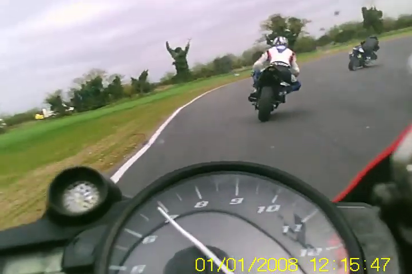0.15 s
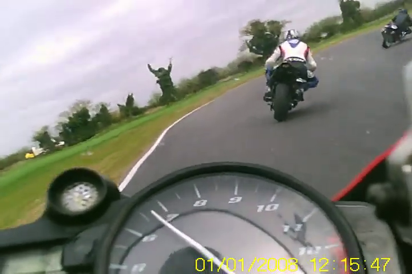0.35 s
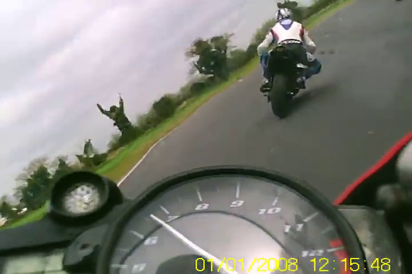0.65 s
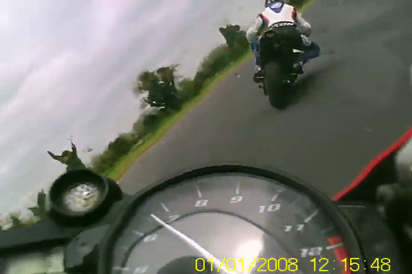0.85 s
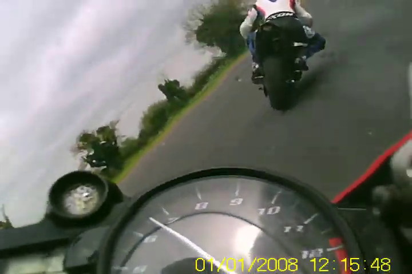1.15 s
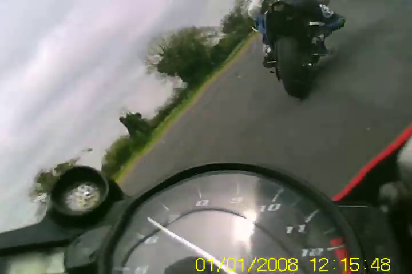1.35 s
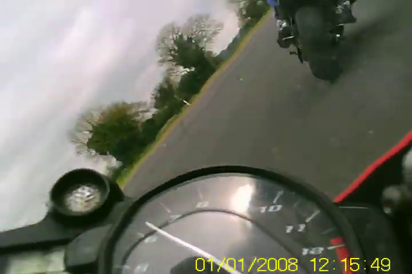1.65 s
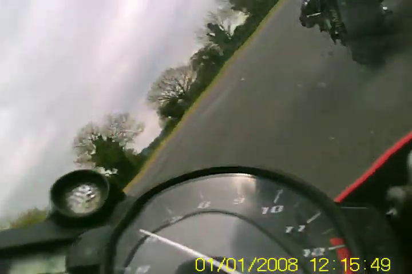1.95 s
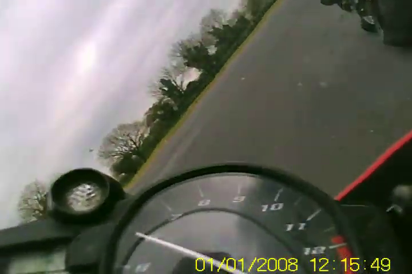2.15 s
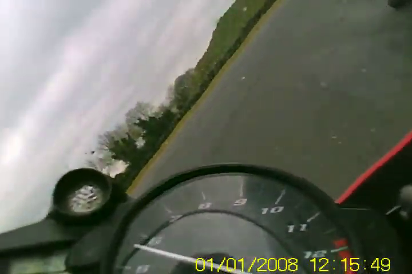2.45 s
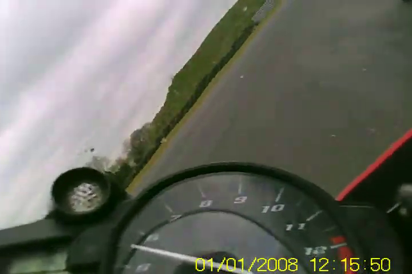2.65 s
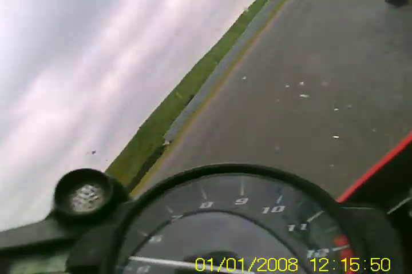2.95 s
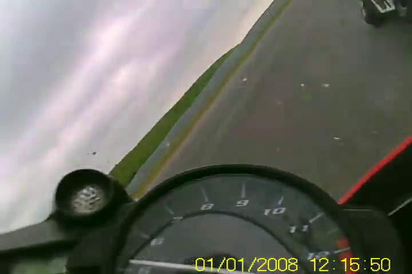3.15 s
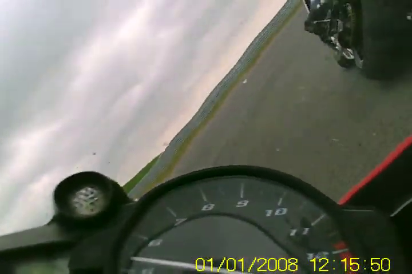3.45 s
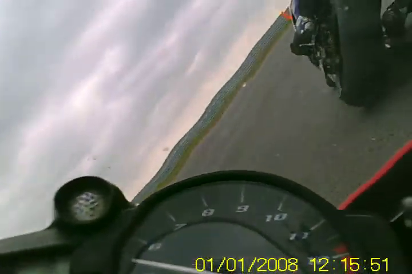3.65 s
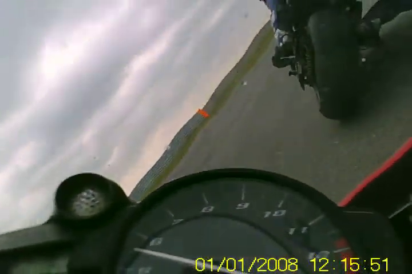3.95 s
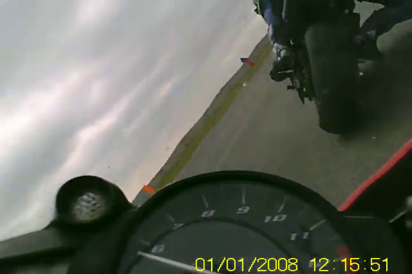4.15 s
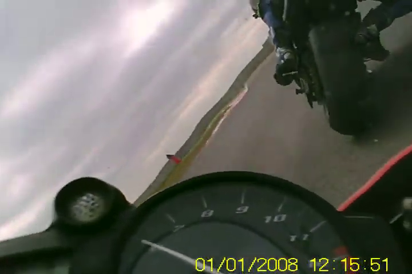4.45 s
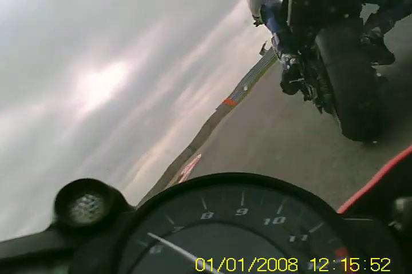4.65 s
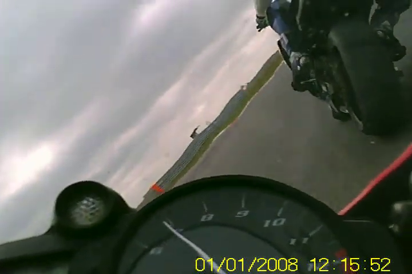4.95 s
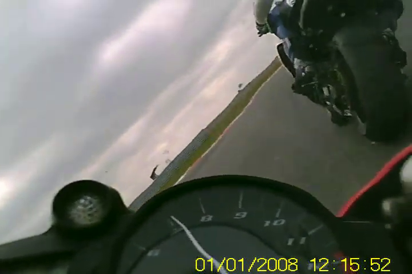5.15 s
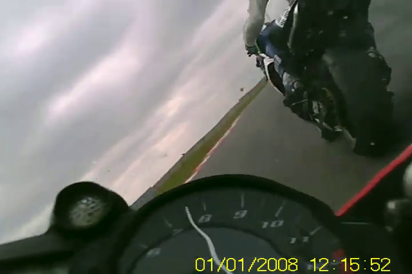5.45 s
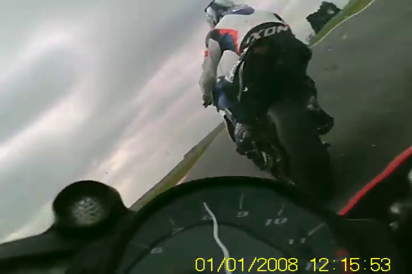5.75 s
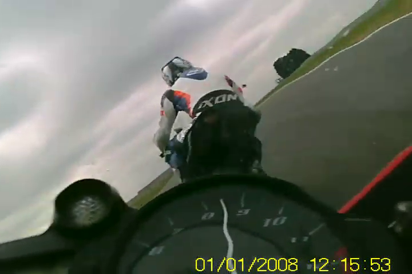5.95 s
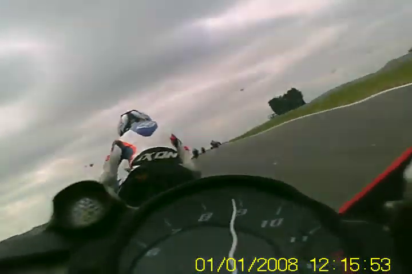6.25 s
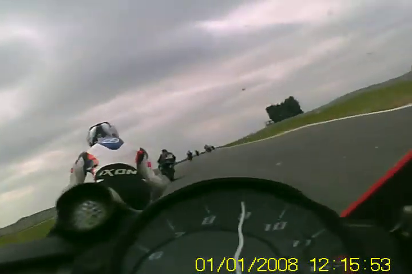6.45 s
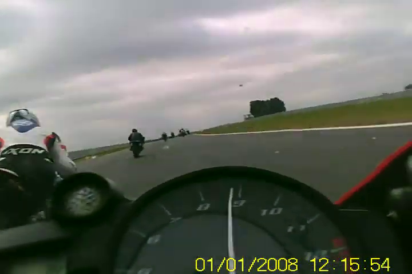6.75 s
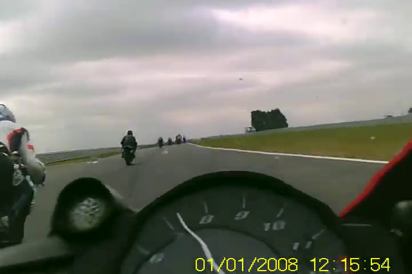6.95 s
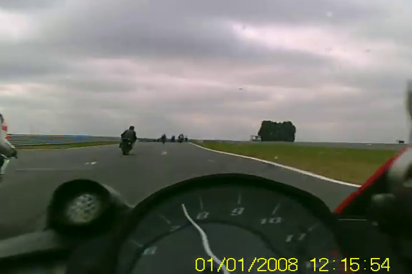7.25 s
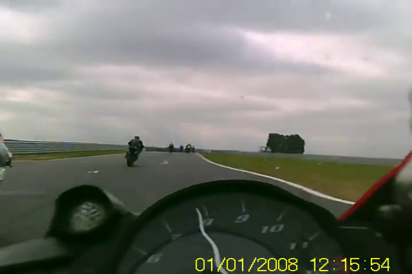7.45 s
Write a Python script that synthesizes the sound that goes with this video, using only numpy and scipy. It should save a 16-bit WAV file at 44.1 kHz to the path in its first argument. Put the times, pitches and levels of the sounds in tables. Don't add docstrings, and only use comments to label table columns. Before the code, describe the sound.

A rough microphone fixed behind a motorcycle screen picks up boxy engine drone, sharp plastic slapping and gusty low wind. The bike slows into a bend, bumps thudding, and the rattling dies away. A second, rougher engine murmurs close ahead. Revs then rise strongly, the chatter returns and thickens into a harsh, slightly distorted buzz, before an upshift drops the pitch and acceleration resumes.

```python
import sys
import numpy as np
from scipy import signal
from scipy.fft import rfft, irfft, next_fast_len
from scipy.io import wavfile
from scipy.ndimage import uniform_filter1d, map_coordinates

SR = 44100
rng = np.random.default_rng(int(sys.argv[2]) if len(sys.argv) > 2 else 0)


def makeup_ratio(level_db):
    decades = np.asarray(level_db, float) / 20
    return 10 ** decades


def int16_out(signal):
    q = np.round(np.clip(np.atleast_2d(signal).T, -1, 1) * 32767)
    wavfile.write(sys.argv[1], SR, q.astype(np.int16))


N = 335160


def unit(x):
    return x / np.sqrt(np.mean(x ** 2) + 1e-20)


def steadied(x, size):
    return x / np.sqrt(np.abs(uniform_filter1d(x ** 2, size=size)) + 1e-12)


def along(points, hz):
    f, v = np.transpose(points)
    return np.interp(np.log(hz + 1), np.log(f + 1), v)


def curves(rows):
    s, *cols = np.transpose(rows)
    return [np.interp(np.arange(N) / SR, s, c) for c in cols]


def spells(rows, column, edge_s):
    t = np.arange(N) / SR
    total = np.zeros(N)
    for row in rows:
        inside = np.minimum(t - row[0], row[0] + row[1] - t)
        total += row[column] * np.clip(inside / edge_s + 0.5, 0, 1)
    return total


def wobble(rate, count=N):
    knots = rng.standard_normal(int(count * rate / SR) + 2)
    return np.interp(np.arange(count) * rate / SR, np.arange(len(knots)), knots)


def filtered(x, response):
    m = next_fast_len(N + SR // 4)
    return irfft(rfft(x, m) * response(np.fft.rfftfreq(m, 1 / SR)), m)[..., :N]


def rush(spectrum):
    return unit(filtered(rng.standard_normal(N), lambda hz: makeup_ratio(along(spectrum, hz))))


def tone(turns, db, flutter_db, rate):
    level_db = db + flutter_db * wobble(rate, len(turns))
    return -np.sqrt(2) * makeup_ratio(level_db) * np.cos(2 * np.pi * turns)


# f/Hz, level/dB
SCREEN_CAVITY = [(80, -8), (150, -9), (250, 5), (320, -3), (420, 3.5), (550, -1), (700, -5), (900, -4),
                 (1200, -1.5), (1500, -13), (2200, -3)]


def stack(turns, level_db, orders, flutter_db, rate, blend):
    step = 8
    coarse = 0
    for multiple, *column_db in orders:
        order_db = level_db[::step] + np.interp(blend[::step], np.arange(len(column_db)), column_db)
        coarse = coarse + tone(multiple * turns[::step] + rng.random(), order_db, flutter_db, rate * step)
    orders_sum = signal.resample_poly(coarse, step, 1)[:N]
    return filtered(orders_sum, lambda hz: makeup_ratio(along(SCREEN_CAVITY, hz)))


def load():
    return curves(OWN_ENGINE)[2] - spells(THROTTLE_LIFTS, column=3, edge_s=0.034)


def in_step(turns):
    s = np.transpose(SLAPS)[0]
    phase = np.exp(2j * np.pi * np.interp(s * SR, np.arange(N), turns + 0.14))
    smooth = np.convolve(phase, np.hanning(7), "same")
    late = np.unwrap(np.angle(smooth)) / (2 * np.pi)
    return turns - uniform_filter1d(np.interp(np.arange(N) / SR, s, late), size=SR // 10)


# t/s, firing rate f/Hz, firing tone level/dB, load level/dB
OWN_ENGINE = [(0.0, 213, -29.5, -37.5), (0.5, 211.6, -21, -31), (1.0, 213.6, -20, -33),
              (1.6, 197.9, -20, -32), (2.0, 186.8, -18.5, -37.5), (2.85, 163.7, -19, -38.5),
              (3.1, 163.5, -20, -37.5), (4.1, 182, -17.5, -36), (4.4, 195.4, -20, -29),
              (4.8, 222, -25, -28), (5.2, 232.9, -34.5, -24.5), (5.6, 254.6, -22, -24.5),
              (5.8, 270.1, -14, -20), (6.2, 283.1, -15, -20), (6.62, 303.2, -18.5, -19),
              (6.75, 228.5, -23.5, -24), (7.0, 235.5, -24, -26), (7.6, 263.4, -19.5, -21.5)]
# t/s, length/s, loss of firing tone/dB, loss of load/dB
THROTTLE_LIFTS = [
    (2.84, 0.252, 7.5, 2),
    (6.62, 0.175, 9, 2),
    (6.69, 0.077, -6, 6),
]
# f/Hz, level/dB
EXHAUST_PIPE = [(330, -4.5), (355, -3), (385, -1.5), (415, -7), (450, 0), (495, -15), (560, -2.5),
                (640, -14), (750, -7)]
# multiple of firing rate, coasting/dB, driving/dB, flat out/dB
OWN_WEAK_ORDERS = [(.5, -2, -0.5, -5), (.75, -7, -12, -17.5), (1.25, -24, -26, -25), (1.5, -21.5, -8, -19),
                   (2.249, -25, -21, -7.5), (2.5, -14.5, -29, -14), (2.75, -18.5, -13, -23),
                   (3.25, -24, -7, -9.5), (3.5, -10.5, -11.5, -22), (3.75, -20, -13, -12.5),
                   (4, -8, -20, -16.5), (4.25, -20, -12, -21), (4.5, -12, -15, -15),
                   (4.75, -18, -18.5, -10), (5, -11.5, -13, -12), (5.5, -13.5, -15.5, -12),
                   (5.75, -20, -27, -14), (6, -12.5, -21, -9.5), (6.5, -11, -12, -17),
                   (6.75, -20, -16, -28), (6.998, -21, -27, -14), (7.248, -24, -9, -16.5),
                   (7.502, -16, -20, -33), (8, -35, -21, -24)]
LOAD_STATES = (-30, -26, -20)


def own_engine():
    hz, first_db, _ = curves(OWN_ENGINE)
    turns = in_step(np.cumsum(hz * (1 + 0.0023 * wobble(60))) / SR)
    lift_db = spells(THROTTLE_LIFTS, column=2, edge_s=0.018)
    above = load() + 30
    second_db = -31 + 1.05 * above + along(EXHAUST_PIPE, 2 * hz) - lift_db
    third_db = -30 + 0.21 * above + along(EXHAUST_PIPE, 3 * hz) - lift_db
    sound = tone(turns, first_db - lift_db, flutter_db=1.1, rate=34)
    sound = sound + tone(2 * turns, second_db, flutter_db=3.5, rate=15)
    sound = sound + tone(3 * turns, third_db, flutter_db=2.0, rate=12)
    blend = np.interp(load(), LOAD_STATES, np.arange(3))
    weak = stack(turns, load() + 1.7, OWN_WEAK_ORDERS, flutter_db=3.0, rate=11, blend=blend)
    return sound + weak, turns


# t/s, engine cycle rate f/Hz, firing tone level/dB, upper orders level/dB
ENGINE_AHEAD = [(0.0, 44.24, -37.5, -45), (0.6, 41.4, -32.5, -77), (1.4, 38.02, -28, -59),
                (1.9, 36.51, -54, -41), (2.8, 39.48, -35, -35.5), (3.4, 41.43, -44.5, -33.5),
                (4.1, 43.07, -30.5, -32.5), (4.6, 47.5, -32, -32), (5.0, 52.22, -29, -27.5),
                (5.6, 62.1, -22, -30), (6.0, 68.36, -26.5, -34), (6.3, 72.5, -34.5, -31.5),
                (6.6, 75.72, -29, -29.5), (6.9, 82.82, -25, -27), (7.6, 94.4, -24.5, -37.5)]
# multiple of cycle rate, level/dB
AHEAD_WEAK_ORDERS = [(2, -4), (4, -1.5), (5, -4), (6, -10.5), (7, -10), (8, 0), (9, -10), (10, -15),
                     (11, -8.5), (12, -14), (13, -15.5), (14, -14), (15, -36), (16, -27), (17, -36),
                     (18, -11), (19, -8), (21, -14.5)]


def engine_ahead():
    hz, firing_db, upper_db = curves(ENGINE_AHEAD)
    turns = np.cumsum(hz * (1 + 0.0029 * wobble(30))) / SR
    cycle_db = -26 - 25 * np.clip((55 - hz) / 3, 0, 1)
    firing = tone(3 * turns, firing_db, flutter_db=2.5, rate=9)
    cycle = tone(turns, cycle_db, flutter_db=3.0, rate=16)
    weak = stack(turns, upper_db, AHEAD_WEAK_ORDERS, flutter_db=4.0, rate=11, blend=0 * hz)
    return firing + cycle + weak


# f/Hz, width/Hz, shaken lightly/dB, shaken hard/dB
HOUSING_MODES = [(1190, 520, -5, -2), (1783, 256, 4.5, -6.5), (2035, 180, -6.5, -1), (2800, 2600, -9, 0),
                 (3100, 284, -0.5, -28), (3390, 160, -3.5, -7.5), (4420, 540, -8.5, -3.5),
                 (5340, 3200, -18, -26), (6364, 460, -4.5, -3.5), (7040, 2100, -17, -13),
                 (8210, 530, -7.5, -8), (9260, 890, -11.5, -6), (11070, 1300, -11, -5.5)]


def housing(x, column, depth=0.55):
    def response(f):
        modes = 0
        for row in HOUSING_MODES:
            centre, width = row[:2]
            modes = modes + makeup_ratio(row[column]) * 1j * f * width / (centre ** 2 - f * f + 1j * f * width)
        return modes * np.abs(modes) ** depth
    return filtered(x, response)


# t/s, rattle level/dB, treble of the contact/dB
MOUNT_RATTLE = [(0.0, -53, -3), (.33, -41, -1), (1.0, -41, -1), (1.78, -51.5, -14), (1.86, -54.5, -14),
                (2.4, -65.5, -7.5), (3.4, -65, -2), (4.15, -58, -8.5), (4.35, -50.5, -12), (4.7, -41.5, -3),
                (5.05, -34, -2.5), (5.7, -31, -3.5), (5.9, -26.5, -4.5), (6.2, -25.5, 1), (6.66, -30, -2.5),
                (6.9, -34, 0.5), (7.3, -34.5, -3.5), (7.6, -29.5, -2.5)]
# level/dB for each of four cylinders, last slapper first
CYLINDER_BLOWS = [
    (-2, -5, -3, -6),
    (-1, -2, -6, -9),
    (0, -1, -3, -5),
]
# t/s, length/s, change of rattle level/dB
MOUNT_JOLTS = [(.19, .125, -9), (.645, .01, -9), (.785, .01, -16), (.876, .012, -16), (.96, .012, -15),
               (.972, .038, 5), (1.035, .008, -11), (1.13, .012, -14), (1.165, .015, -11),
               (1.195, .015, -5), (1.3, .042, -3), (1.35, .06, -4.5), (1.43, .021, -13), (1.92, .05, 4),
               (2.07, .01, 7), (2.22, .01, 8), (2.4, .015, 7), (2.47, .022, 11), (2.765, .01, 7),
               (2.93, .012, 7), (3.085, .08, 9), (3.21, .05, 4), (3.44, .04, 4), (3.51, .023, 8),
               (3.57, .05, 7), (3.66, .04, 8), (3.722, .045, 11), (3.79, .05, 11), (3.875, .022, 11),
               (3.93, .04, 4), (3.995, .02, 7), (4.418, .014, 9), (4.605, .012, -7), (4.7, .025, 3.5),
               (4.81, .02, -12), (6.7, .028, -17), (6.73, .03, -6), (6.762, .035, -14), (7.14, .014, -9),
               (7.365, .027, -7)]


def mount(turns):
    level_db, treble_db = curves(MOUNT_RATTLE)
    light_hz, hard_hz = 207, 275
    shaking = np.clip((curves(OWN_ENGINE)[0] - light_hz) / (hard_hz - light_hz), 0, 1)
    hard = np.clip(4 * shaking - 3, 0, 1)
    firing, since = np.divmod(turns + 0.1446, 1)
    firing = firing.astype(int)

    slapped = np.round((np.transpose(SLAPS)[0] + 0.001) * SR).astype(int)
    last_slap = np.clip(np.searchsorted(slapped, np.arange(N)) - 1, 0, None)
    cylinder = (firing - firing[slapped][last_slap]) % 4
    strength = np.clip(4 * shaking - 0.2, 0, 1) + hard
    blow_db = map_coordinates(np.array(CYLINDER_BLOWS, float), [strength, cylinder], order=1)
    blow_db = blow_db * np.clip((level_db + 60) / 14, 0.3, 1)
    spread_db = 1.3 + 0.9 * np.clip((-38 - level_db) / 8, 0, 1)
    scatter_db = spread_db * rng.standard_normal(N // 100)[firing]
    size = makeup_ratio(blow_db + scatter_db + (1.8 - 1.1 * hard) * wobble(18))

    swell = since / (0.12 + 0.1 * shaking)
    burst = swell * np.exp(1 - swell) + 0.03 + 0.09 * hard
    chatter = size * burst * rng.standard_normal(N)

    steps = np.minimum(since, 1 - since) / np.gradient(turns)
    blunt = 3.5 + 7 * shaking
    knock_size = np.roll(size * makeup_ratio(-0.35 * blow_db), -5)
    knock = knock_size * np.clip(1 - steps / blunt, 0, 1) / blunt
    blows = chatter + (14 - 9 * np.clip(3 * shaking, 0, 1) + 6 * hard) * knock

    tight = np.clip(2 * shaking - 1, 0, 1)
    rattle = housing(blows * (1 - tight), column=2) + housing(blows * tight, column=3)
    steady = np.sqrt(np.abs(uniform_filter1d(rattle ** 2, size=SR // 3)) + 1e-12)
    treble = filtered(rattle, lambda hz: 1 / (1 + (2600 / (hz + 1)) ** 6))
    rattle = rattle + (makeup_ratio(treble_db) - 1) * treble
    return makeup_ratio(level_db + spells(MOUNT_JOLTS, column=2, edge_s=0.0017) + 7.0) * rattle / steady


# f/Hz, level/dB
FAIRING = [(1400, -9), (1800, -4), (4700, -1.5), (5400, -21), (6350, -7), (8600, -28), (10000, -19),
           (11500, -32)]


def valve_train(turns):
    ticks = makeup_ratio(3.2 * wobble(60)) * np.exp(-(turns % 1) / 2.2) * rng.standard_normal(N)
    dull = filtered(housing(ticks, column=3), lambda hz: makeup_ratio(along(FAIRING, hz)))
    jolt_db = 0.4 * spells(MOUNT_JOLTS, column=2, edge_s=0.003)
    return makeup_ratio(-50.5 + (load() + 30) / 2 + jolt_db) * unit(dull)


# t/s, buffeting level/dB
WIND_GUSTS = [(0.0, -45), (0.59, -34), (1.48, -34.5), (1.57, -25), (1.67, -44), (1.97, -33.5), (2.33, -44),
              (2.45, -37), (3.32, -28.5), (4.32, -29.5), (4.4, -34), (4.42, -24.5), (5.16, -29.5),
              (5.21, -23), (5.52, -30.5), (6.05, -22), (6.14, -27), (7.6, -21)]
# f/Hz, level/dB per Hz
BUFFET_SPECTRUM = [(5, -42), (12, 6.5), (28, 5.5), (55, 2.5), (120, -10.5), (250, -11), (500, -58)]
# f/Hz, level/dB per Hz
ROAR_SPECTRUM = [(60, -42), (130, 5.5), (250, 5.5), (450, 7.5), (800, 0.5), (1050, -5.5), (1280, 5.5),
                 (1450, -10.5), (2500, -16.5), (6000, -29.5)]
# f/Hz, level/dB per Hz
PANEL_SPECTRUM = [(70, -12), (120, 9.5), (180, 9), (260, 6), (400, -56)]


def air():
    lumps = makeup_ratio(2 * wobble(9) + 2 * wobble(40))
    buffet = steadied(lumps * rush(BUFFET_SPECTRUM), size=SR // 5)
    roar = unit(makeup_ratio(0.53 * wobble(20) + 1.7 * wobble(2.7)) * rush(ROAR_SPECTRUM))
    drum = unit(makeup_ratio(3.2 * wobble(20)) * rush(PANEL_SPECTRUM))
    roar_db = -31 + 0.87 * (np.minimum(load(), -26) + 30.5)
    drum_db = -38.5 - 0.46 * (load() + 30)
    return makeup_ratio(curves(WIND_GUSTS)[0] + 3.0) * buffet + makeup_ratio(roar_db) * roar + makeup_ratio(drum_db) * drum


# t/s, level/dB, ring/dB
BRAKING_SLAPS = [(0.0095, -25, -5), (0.0663, -28, -6), (0.0848, -27, -9), (0.1038, -24, -9),
                 (0.1222, -27, -5), (0.1407, -29, -6), (0.1601, -25, -10), (0.1791, -24, -9),
                 (0.2215, -38, 1), (0.2549, -29, -7), (0.2739, -26, -7), (0.3123, -27, -4),
                 (0.3312, -27, -4), (0.3312, -19, -11), (0.3507, -19, -10), (0.3696, -20, -10),
                 (0.3886, -20, -10), (0.4081, -22, -9), (0.427, -24, -6), (0.4465, -17, -12),
                 (0.4654, -19, -11), (0.4849, -19, -10), (0.5038, -19, -10), (0.5233, -18, -11),
                 (0.5423, -22, -7), (0.5617, -21, -10), (0.5807, -22, -11), (0.6006, -22, -9),
                 (0.6096, -20, -12), (0.638, -22, -11), (0.6575, -21, -9), (0.6765, -24, -7),
                 (0.6959, -24, -8), (0.7343, -22, -11), (0.7538, -22, -8), (0.7917, -22, -10),
                 (0.8256, -25, -5), (0.8545, -21, -9), (0.8885, -27, -8), (0.8979, -24, -11),
                 (0.9079, -23, -11), (0.9269, -25, -7), (0.9513, -23, -10), (0.9658, -22, -7)]
# t/s, level/dB, ring/dB
FADING_SLAPS = [(1.0428, -24, -10), (1.0862, -29, -1), (1.1061, -27, 0), (1.1211, -23, -10),
                (1.1401, -27, -3), (1.1795, -27, -3), (1.2089, -20, -9), (1.2383, -25, -10),
                (1.2628, -29, -7), (1.3027, -32, -3), (1.3162, -28, -3), (1.3371, -26, -4),
                (1.3665, -31, -4), (1.3765, -30, -4), (1.4005, -29, -2), (1.4164, -21, -9),
                (1.4558, -28, -4), (1.4753, -34, -2), (1.4953, -31, -4), (1.5152, -29, -3),
                (1.5362, -29, -1), (1.5556, -33, -6), (1.5751, -31, -2), (1.596, -35, 2), (1.6165, -37, 2),
                (1.6265, -32, 0), (1.6579, -35, 2), (1.6783, -30, -1), (1.6988, -29, -1), (1.7187, -29, -2),
                (1.7502, -34, 1), (1.7502, -31, -1), (1.7811, -33, -1), (1.8465, -39, -4)]
# t/s, level/dB, ring/dB
DRIVING_SLAPS = [(4.0899, -38, -1), (4.1557, -39, 0), (4.1717, -34, -5), (4.2146, -32, -10),
                 (4.2575, -28, -3), (4.2764, -24, -5), (4.3064, -34, -1), (4.3203, -32, -5),
                 (4.3418, -27, -2), (4.3602, -26, -2), (4.3812, -32, -4), (4.4036, -28, -1),
                 (4.4221, -25, -3), (4.4645, -31, -5), (4.4845, -28, -6), (4.5029, -30, -3),
                 (4.5458, -24, -12), (4.5668, -25, -10), (4.5842, -31, 0), (4.6047, -25, -9),
                 (4.6296, -21, -13), (4.6496, -29, -5), (4.668, -24, -7), (4.687, -27, -8),
                 (4.7065, -25, -5), (4.7444, -20, -9), (4.7628, -24, -6), (4.7903, -26, -4),
                 (4.8367, -23, -4), (4.8506, -19, -6), (4.8731, -26, -2), (4.891, -21, -7),
                 (4.909, -24, -6), (4.927, -20, -7), (4.9449, -23, -4), (4.9808, -18, -6),
                 (5.0123, -21, -5), (5.0307, -21, -4), (5.0442, -17, -8), (5.0786, -21, -4),
                 (5.0961, -19, -6), (5.114, -18, -7), (5.135, -21, -6), (5.147, -18, -6), (5.1649, -17, -8),
                 (5.1983, -21, -6), (5.2153, -16, -8), (5.2333, -17, -7), (5.2662, -18, -4),
                 (5.2831, -17, -6), (5.3006, -19, -6), (5.3201, -20, -9), (5.333, -20, -6),
                 (5.3505, -21, -3), (5.367, -18, -5), (5.4004, -18, -4), (5.4158, -16, -6),
                 (5.4488, -18, -5)]
# t/s, level/dB, ring/dB
SHIFTED_SLAPS = [(6.7323, -27, -2), (6.7523, -23, -8), (6.7757, -28, -10), (6.7892, -21, -7),
                 (6.8066, -21, -5), (6.856, -17, -10), (6.8805, -19, -10), (6.8929, -16, -11),
                 (6.9363, -19, -7), (6.9543, -16, -11), (6.9792, -16, -10), (7.0142, -14, -12),
                 (7.0481, -16, -11), (7.0695, -21, -6), (7.082, -15, -9), (7.099, -15, -9),
                 (7.1164, -18, -9), (7.1568, -21, -6), (7.1868, -17, -10), (7.2067, -18, -10),
                 (7.2476, -22, -5), (7.2596, -22, -5), (7.292, -19, -7), (7.3908, -19, -6),
                 (7.4517, -18, -9), (7.4676, -16, -11), (7.5175, -16, -9), (7.5604, -16, -8),
                 (7.5769, -11, -11)]
# t/s, level/dB, ring/dB
FLAT_OUT_SLAPS = [(5.4484, -21, -2), (5.4658, -22, -1), (5.4818, -22, -2), (5.5132, -23, -1),
                  (5.5302, -22, -3), (5.5611, -21, -3), (5.6095, -21, -3), (5.6619, -20, -6),
                  (5.6988, -14, -12), (5.7287, -22, -5), (5.7452, -19, -8), (5.7751, -15, -11),
                  (5.7896, -14, -12), (5.805, -15, -11), (5.82, -16, -8), (5.8489, -14, -9),
                  (5.8794, -14, -10), (5.8938, -12, -12), (5.9223, -12, -12), (5.9512, -15, -9),
                  (5.9806, -16, -9), (6.0091, -14, -9), (6.053, -14, -8), (6.0859, -13, -9),
                  (6.1218, -15, -8), (6.1642, -11, -12), (6.1927, -13, -10), (6.2351, -8, -14),
                  (6.3054, -10, -10), (6.3343, -14, -9), (6.4137, -13, -10), (6.4306, -12, -11),
                  (6.4536, -13, -11), (6.4815, -15, -8), (6.5319, -16, -7), (6.5913, -19, -4)]
SLAPS = BRAKING_SLAPS + FADING_SLAPS + DRIVING_SLAPS + SHIFTED_SLAPS


def slaps(rows, column, trim_db, ring_trim_db):
    s, db, ring_db = np.transpose(rows)
    t = np.arange(SR // 200) / SR
    rise_s = 0.001
    swell = t / rise_s * np.exp(1 - t / rise_s)
    rebounds = rfft(swell * rng.standard_normal((len(s), len(t))))
    flat = rebounds / (np.abs(rebounds) + 1e-9)
    contact = np.sqrt(swell) * irfft(flat, len(t))
    contact = contact / np.linalg.norm(contact, axis=1)[:, None]
    at = (np.round(s * SR).astype(int)[:, None] + np.arange(len(t))).ravel()

    def lay(gain_db, shape):
        return np.bincount(at, (makeup_ratio(gain_db)[:, None] * shape).ravel(), N)

    def high(hz):
        return 1 / (1 + (2500 / (hz + 1)) ** 6)

    treble_hits = lay(db + 24 + trim_db, contact)
    ring_hits = lay(db + ring_db + 35 + ring_trim_db, contact)
    treble = filtered(housing(treble_hits, column, depth=0.99), high)
    ring = filtered(housing(ring_hits, column, depth=1.0), lambda hz: 1 - high(hz))
    push = -(t / 0.0012) * np.exp(1 - t / 0.00057)
    return treble + ring + lay(db - 9, push)


# t/s, peak level/dB, f/Hz
ROAD_BUMPS = [
    (0.276, -14, 252),
    (.72, -21, 304),
    (0.969, -5, 186),
    (1.049, -13, 230),
    (1.121, -5.5, 205),
    (1.38, -5, 201),
    (1.581, -8.5, 197),
    (5.267, -14, 120.6),
]


def bumps():
    out, t = np.zeros(N + SR), np.arange(SR // 20) / SR
    for s, db, hz in ROAD_BUMPS:
        decay = makeup_ratio(db - 60 * t / 0.029)
        out[round(s * SR):][:len(t)] += decay * np.sin(2 * np.pi * hz * t)
    return out[:N]


def scene():
    engine, turns = own_engine()
    rattle = mount(turns) + slaps(SLAPS, column=2, trim_db=-2, ring_trim_db=-6)
    rattle = rattle + slaps(FLAT_OUT_SLAPS, column=3, trim_db=-4, ring_trim_db=-9)
    return (engine + engine_ahead() + rattle + valve_train(turns) + air() + bumps())[None]


def low_pass(x):
    return signal.sosfilt(signal.butter(12, 12260, fs=SR, output="sos"), x)


# f/Hz, level/dB
MICROPHONE = [(10500, -2.5), (11500, -19), (12200, -28.5), (13000, -64), (16000, -59)]


def record(dry):
    lopsided = 0.11
    offset, top = -0.0067, 0.8
    swing = lopsided * steadied(dry, size=SR // 4)
    bent = dry * (1 - swing / (1 + np.abs(swing)))
    bent = bent - uniform_filter1d(bent - dry, size=SR // 8)
    heard = filtered(bent, lambda hz: makeup_ratio(along(MICROPHONE, hz))) + offset
    heard = heard / (1 + (heard / top) ** 4) ** (1 / 4)
    return low_pass(heard)


dry = scene()
out = record(dry)
int16_out(out)
```